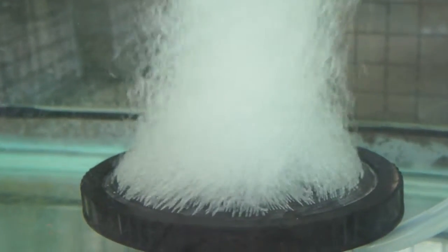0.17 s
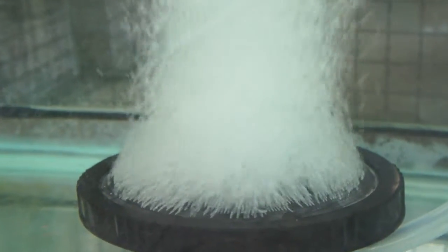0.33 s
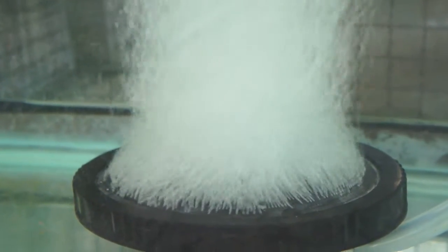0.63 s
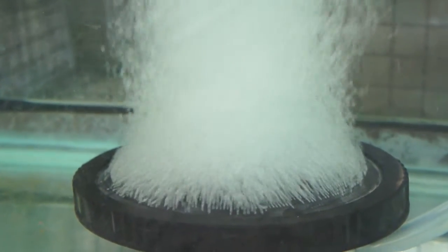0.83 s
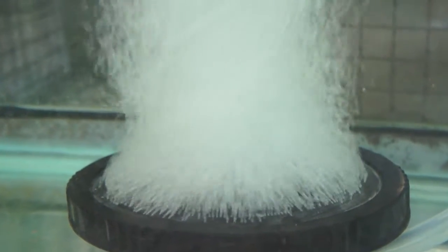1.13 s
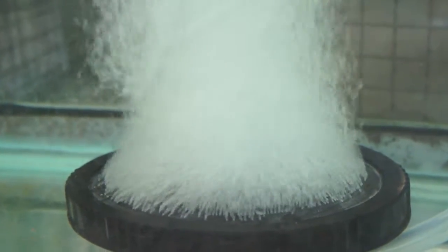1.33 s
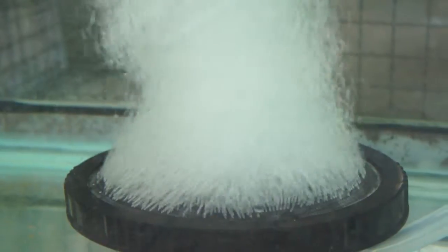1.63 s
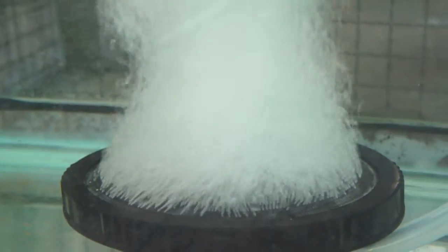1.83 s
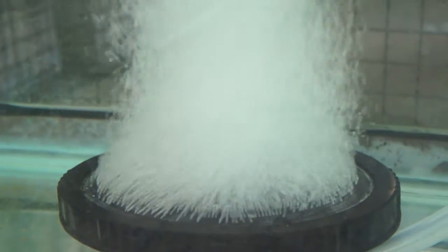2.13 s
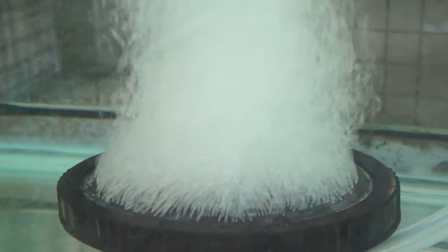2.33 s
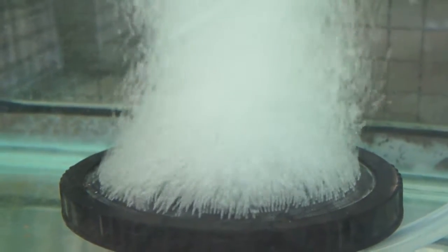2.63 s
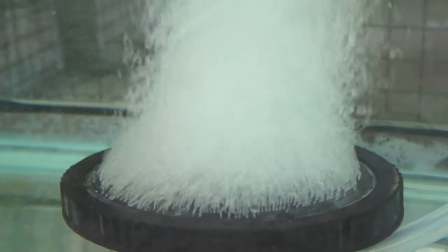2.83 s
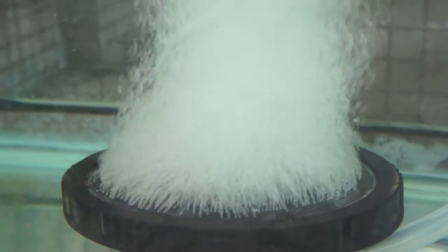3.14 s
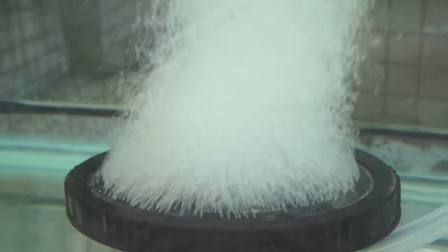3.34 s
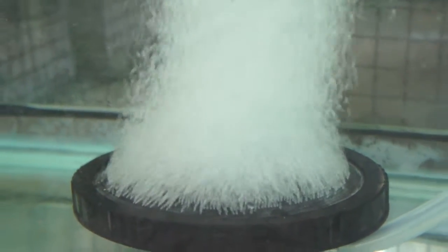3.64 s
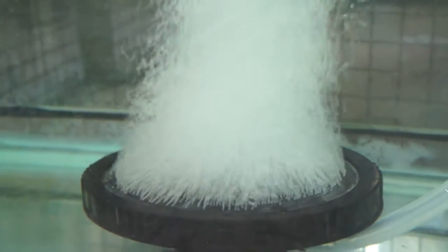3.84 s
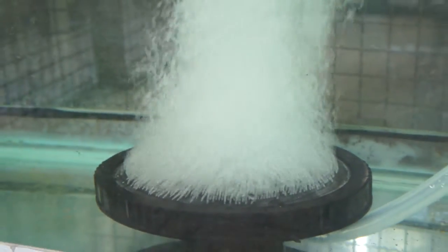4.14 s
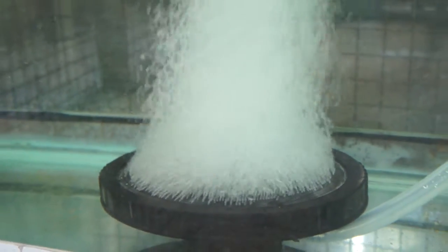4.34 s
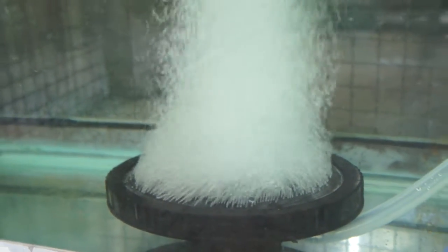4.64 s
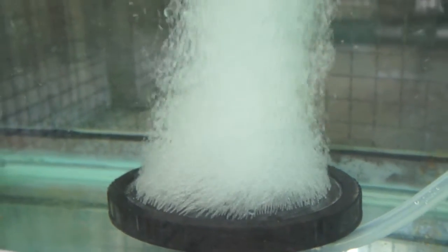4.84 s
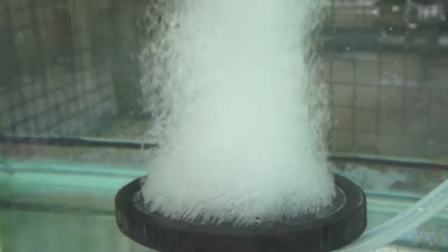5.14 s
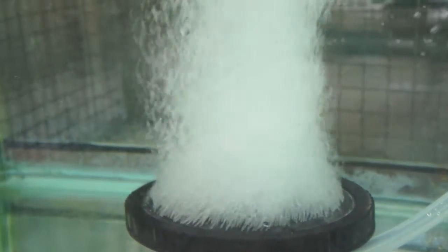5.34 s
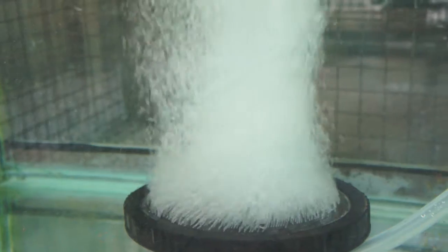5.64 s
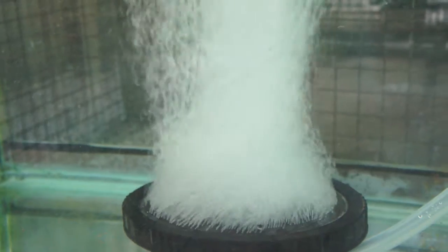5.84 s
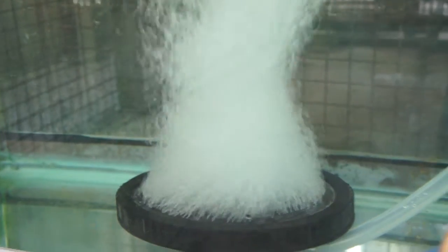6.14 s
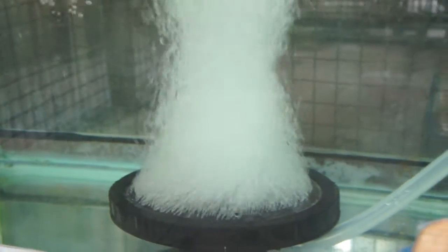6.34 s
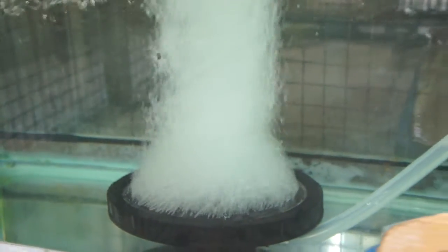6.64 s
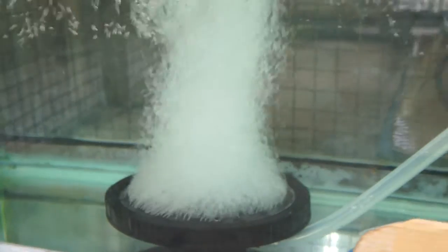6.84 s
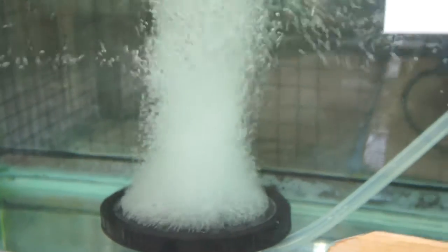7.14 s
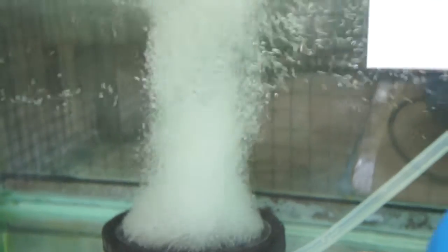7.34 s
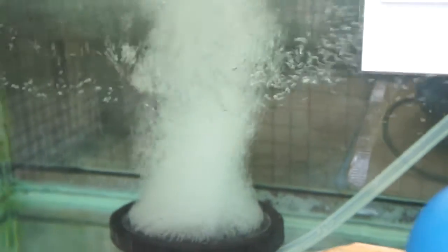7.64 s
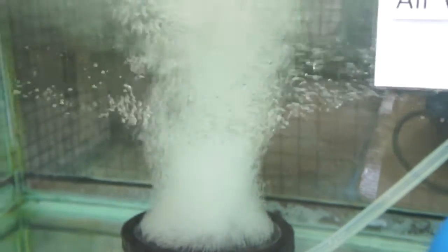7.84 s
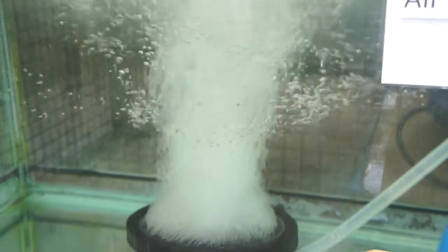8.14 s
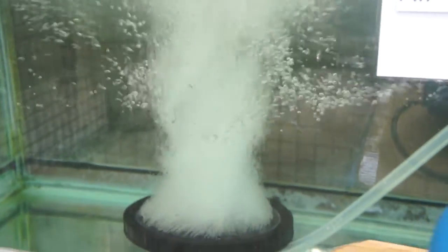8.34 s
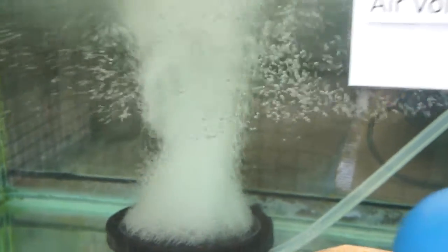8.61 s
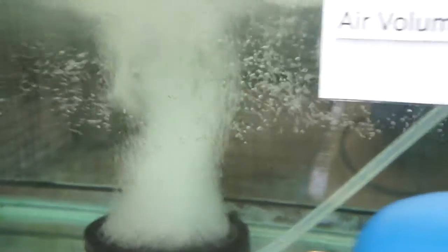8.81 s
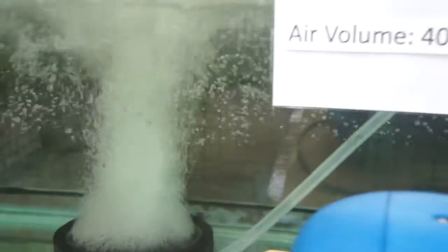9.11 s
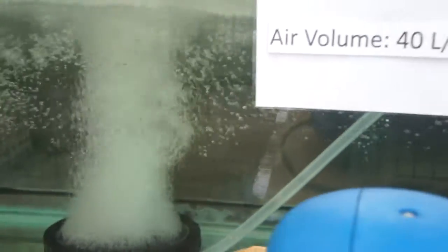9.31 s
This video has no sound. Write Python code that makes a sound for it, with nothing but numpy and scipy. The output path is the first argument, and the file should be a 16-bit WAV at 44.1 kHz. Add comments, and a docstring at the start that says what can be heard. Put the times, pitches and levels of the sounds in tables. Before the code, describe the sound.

An air blower drones with a throbbing hum over steadily bubbling, fizzing water and occasional small splashes.

```python
"""A steady drone and a throbbing hum over bubbling water, with a small splash now and then.
A mains-driven diaphragm air blower makes the hum; its flap valves rasp on every stroke.
It feeds a disc diffuser in a glass tank, where a column of bubbles churns, surges and fizzes.
The listener moves through the room's standing waves, so the drone fades out and returns."""
import sys
import numpy as np
from scipy import signal
from scipy.fft import rfft, irfft, next_fast_len
from scipy.io import wavfile
from scipy.ndimage import map_coordinates

SR = 44100
rng = np.random.default_rng(int(sys.argv[2]) if len(sys.argv) > 2 else 0)


def unload_audio(sound):
    """Save the sound as a 16-bit wav file, at the path given as the first command line argument."""
    columns = np.transpose(np.atleast_2d(sound))
    # keep every value between -1 and 1, then stretch to whole-number steps
    steps = np.round(np.clip(columns, -1, 1) * 32767)
    wavfile.write(sys.argv[1], SR, steps.astype(np.int16))


N = 417627
TIME = np.arange(N) / SR
STROKE_HZ, DRONE_ORDER = 60.011, 11
SOUND_M_PER_S = 343
EARS = np.array([[.5], [-.5]])  # splits a left-minus-right value

# Listener's path. Each row: time in seconds, left and right ear's offset from the drone's node in m.
WALK = [(0, 0.11, 0.11), (4.7, 0.11, 0.093), (5.5, 0.089, 0.067), (6.5, 0.065, 0.03), (7, .033, 0.031),
        (7.5, 0.0026, 0.025), (8.3, -0.029, 0), (9.47, -0.048, -0.033)]
# The tank lies to the left. Each row: frequency in Hz, left minus right in dB.
PAN = [(45, 3), (130, 3), (380, 4), (650, 5.5), (1200, 4.5), (2000, 1.1), (11000, 1)]
# Stereo field. Each row: frequency in Hz, left-right correlation.
CORRELATION = [(60, 0.69), (300, 0.89), (550, 0.68), (700, 1), (1000, 0.064), (2000, 0.12), (3000, -0.19),
               (5000, -0.46), (6300, -0.4), (8000, -0.03), (11000, 0.098)]
# How hard the water churns. Each row: time in seconds, level in dB.
CHURN = [(0, -0.5), (2.8, 1.4), (4.2, 3), (5.7, 3.5), (6.4, 0.7), (8.2, -1.25), (9.47, -1.5)]
# Water and valve spectra. Each row: frequency in Hz, relative density in dB.
GURGLE_SPECTRUM = [(20, -33), (45, -16), (85, -5.5), (170, -3), (300, -1), (550, -3.5), (850, -7.5),
                   (1300, -23), (3000, -63.5)]
BUBBLING_SPECTRUM = [(300, -44), (700, -12), (1000, 2.5), (1600, 0.5), (2400, -2), (3300, -8),
                     (4500, -16.5), (9000, -73)]
FIZZ_SPECTRUM = [(1500, -49), (2800, -3), (3800, 1.5), (5000, 0.5), (6700, -2.5), (7600, -8), (9000, -8.5),
                 (11000, -11.5)]
VALVE_SPECTRUM = [(1500, -39), (2000, 7.5), (3400, 2), (4200, -7), (5800, -4), (6700, -2), (7500, -6),
                  (11000, -20)]
# Surface surges. Each row: peak time and half length in seconds, level in dB, centre in Hz,
# spray relative to the surge in dB.
SURGES = [(4.12, 0.81, -42.5, 2700, -8.5), (5.4, .5, -44, 1370, -31), (5.3, .25, -45, 2600, -24),
          (5.83, .17, -45, 3200, -25)]
# Splashes. Each row: start in seconds, level in dB, centre in Hz, width in octaves, decay in seconds.
SPLASHES = [(0.516, -37.5, 3170, 0.22, 0.044), (0.904, -40, 3200, 0.65, .06), (0.986, -47, 8050, 0.57, .04),
            (1.962, -42, 4820, 0.35, 0.061), (2.182, -48, 8600, 0.24, 0.049), (2.267, -45, 6460, .8, .05),
            (3.763, -46.5, 8500, .4, .045), (3.979, -34.5, 3900, 0.41, 0.026),
            (4.601, -40.5, 4000, 0.55, 0.06), (7.039, -43, 1690, 1.3, .06), (7.344, -38, 2380, 1.1, .045),
            (7.649, -45.5, 4500, 1.1, .07), (7.949, -45, 4500, 0.58, .043), (8.54, -44.5, 5450, .08, .02),
            (8.747, -36, 2400, 0.71, .035), (8.87, -43.5, 3600, .8, .04)]
# Strong hum partials. Each row: multiple of the stroke rate, level at the first spot in dB,
# change at the second spot in dB, left minus right in dB.
STRONG_PARTIALS = [(1, -50.7, -15, -2), (2, -38.7, -2.5, 1), (3, -35.7, -2.5, 3), (4, -43.2, 0, 1.5),
                   (5, -37.5, .5, 5), (7, -43, -7.5, 4), (9, -45.2, -11, 6), (10, -39.2, -9, 3.5),
                   (12, -45, -8, 6), (14, -35.8, -2.3, 6.5), (18, -38, -6.2, -2.5), (21, -48.7, -6, 9),
                   (24, -47.5, -7, 6), (26, -44, -6, 0), (27, -47.5, -4, -3), (28, -42.3, -9.5, 0)]
# Envelope of the weak partials. Each row: frequency in Hz, level in dB.
WEAK_SPECTRUM = [(360, -49.5), (480, -59), (780, -54.5), (900, -63.5), (1300, -56.5), (1740, -53),
                 (1850, -58)]
# Blower phase. Each row: frequency in Hz, left ear's lag behind the right in radians.
EAR_LAG = [(120, .03), (400, 0.24), (660, 0.89), (1260, 1.34), (1700, 1.22)]


def amp(db):
    """Decibels to gain."""
    return 10 ** (np.asarray(db) / 20)


def unit(x):
    """x at rms 1."""
    return x / np.sqrt(np.mean(x ** 2) + 1e-20)


def along(points, hz):
    """(Hz, value) points read on a log axis."""
    knots_hz, values = np.transpose(points)
    return np.interp(np.log(hz + 1), np.log(knots_hz + 1), values)


def curves(rows):
    """One value per sample for each column after the time."""
    times_s, *columns = np.transpose(rows)
    return np.array([np.interp(TIME, times_s, column) for column in columns])


def wobble(knots_per_s):
    """Smooth random curve."""
    coarse_s = TIME[::64]
    knots = rng.standard_normal(int(TIME[-1] * knots_per_s) + 4)
    return np.interp(TIME, coarse_s, map_coordinates(knots, [coarse_s * knots_per_s]))


def filtered(x, response):
    """x through a frequency response."""
    size = x.shape[-1]
    padded = next_fast_len(size + SR // 8)
    return irfft(rfft(x, padded) * response(np.fft.rfftfreq(padded, 1 / SR)), padded)[..., :size]


def bell(centre_hz, octaves):
    """Bell-shaped response on a log axis."""
    return lambda hz: np.exp(-.5 * (np.log2((hz + 1) / centre_hz) / octaves) ** 2)


def spread(pair, spectrum):
    """Two unrelated signals to a coloured stereo field, rms 1."""
    def field(hz):
        turn_rad = np.arccos(np.clip(along(CORRELATION, hz), -1, 1)) / 2
        left = amp(along(PAN, hz) / 2)
        mid, side = np.cos(turn_rad), np.sin(turn_rad)
        mix = np.array([[mid * left, side * left], [mid / left, -side / left]])
        return amp(along(spectrum, hz)) * mix
    return unit(filtered(pair, field).sum(axis=1))


def arrival(midway_m=0.025, blend_m=0.037):
    """Listener's progress from the first spot (0) to the second (1)."""
    return .5 + .5 * np.tanh((midway_m - curves(WALK)[0]) / blend_m)


def wash(centre_hz, octaves):
    """One band of the water's rush, stereo, rms 1."""
    return spread(filtered(rng.standard_normal((2, N)), bell(centre_hz, octaves)), [(centre_hz, 0)])


def rumble(start_s=2.8, end_s=7.5, fade_s=.9, level_db=-54):
    """Uneven low rumble under the hardest churn."""
    held = np.clip(np.minimum(TIME - start_s, end_s - TIME) / fade_s, 0, 1)
    return held * amp(level_db - wobble(3)) * wash(centre_hz=85, octaves=0.13)


def surges():
    """The column breaks the surface harder: a swell in the band of its bubble size, plus spray."""
    out = np.zeros((2, N))
    spray = wash(centre_hz=6940, octaves=0.097)
    for peak_s, half_s, db, centre_hz, spray_db in SURGES:
        swell = amp(db) * np.exp(-((TIME - peak_s) / half_s) ** 2)
        out += swell * (wash(centre_hz, octaves=0.21) + amp(spray_db) * spray)
    return out


def splashes(rise_s=0.0026, spikiness=.4, clumps_per_s=250, spray_db=-16):
    """Short showers of droplets landing in clumps, with fine spray; different at each ear."""
    out = np.zeros((2, N + SR))
    t = np.arange(SR // 4) / SR
    for start_s, db, centre_hz, octaves, decay_s in SPLASHES:
        drops = rng.standard_normal((2, len(t))) * np.exp(spikiness * rng.standard_normal(len(t)))
        drops *= amp(map_coordinates(rng.standard_normal(80), [t * clumps_per_s], mode="nearest"))
        shower = unit(filtered(drops, bell(centre_hz, octaves)))
        spray = amp(spray_db) * unit(filtered(drops, bell(centre_hz=8500, octaves=0.27)))
        envelope = (1 - np.exp(-t / rise_s)) * np.exp(-(t / decay_s) ** 2)
        at = round(start_s * SR)
        out[:, at:at + len(t)] += amp(db) * envelope * (shower + spray)
    return out[:, :N]


def bubbles(low_hz, high_hz, decay_cycles, scatter_db, count, samples):
    """Bubble swarm: damped sines, each rising slightly in pitch as it nears the surface."""
    when, pitch, strength = rng.random((count, 3)).T[:, :, None]
    hz = low_hz + (high_hz - low_hz) * pitch
    cycles = hz * np.arange(samples) / SR
    age = cycles / decay_cycles
    gain = np.sqrt(hz) * amp(-scatter_db * np.log(np.maximum(1 - strength, 1 / count)))
    envelope = np.exp(-age) * (1 - np.exp(-2 * cycles))
    rings = gain * envelope * np.sin(2 * np.pi * cycles * (1 + 0.021 * age))
    at = (when * N).astype(int) + np.arange(samples)
    return unit(np.bincount(at.ravel(), rings.ravel(), N)[:N])


def froth(spectrum, swarms, swarm_db):
    """Near bubbles over the noise of countless others."""
    return spread(rng.standard_normal((2, N)) + amp(swarm_db) * np.array(swarms), spectrum)


def water(gurgle_db=-36, bubbling_db=-38, fizz_db=-44.5):
    """Big bubbles gurgle, medium ones burst at the surface, the finest fizz; all grow with the churn."""
    churn_db, = curves(CHURN)
    heave = wobble(4.4)
    medium = [bubbles(774, 3880, decay_cycles=4.6, scatter_db=1.0, count=8000, samples=300)
              for _ in range(2)]
    fine = [bubbles(3070, 10860, decay_cycles=4, scatter_db=1.5, count=14000, samples=100)
            for _ in range(2)]
    gurgle_gain = amp(gurgle_db + 0.61 * churn_db + 0.47 * wobble(5.9))
    gurgle = gurgle_gain * spread(rng.standard_normal((2, N)), GURGLE_SPECTRUM)  # too dense to resolve
    bubbling_gain = amp(bubbling_db + 0.98 * churn_db + 0.3 * heave + 0.89 * wobble(12))
    bubbling = bubbling_gain * froth(BUBBLING_SPECTRUM, medium, swarm_db=-14)
    fizz_gain = amp(fizz_db + 0.42 * churn_db - 0.4 * arrival() + 0.42 * heave + 0.36 * wobble(22))
    fizz = fizz_gain * froth(FIZZ_SPECTRUM, fine, swarm_db=-10.5)
    return gurgle + bubbling + fizz


def reflections(x, depth_db=1.67, spacing_hz=90, drift_per_s=0.77):
    """Echoes off glass and walls ripple the spectrum; the ripple drifts as the listener moves."""
    hz, times_s, frames = signal.stft(x, SR, nperseg=2048)
    grid = np.meshgrid(hz / spacing_hz, times_s * drift_per_s, indexing="ij")
    knots = rng.standard_normal((2, 400, 16))
    ripple = np.array([map_coordinates(ear, grid, mode="mirror") for ear in knots])
    taper = np.clip(hz / 2000, 0, 1)[:, None]  # long waves stay smooth
    return signal.istft(frames * amp(depth_db * ripple * taper), SR, nperseg=2048)[1][:, :N]


def valves(first_spot_db=-50.5, second_spot_db=-55):
    """Flap valves rasp alike on every stroke: a comb of faint high partials, different at each spot."""
    samples = round(SR / STROKE_HZ)
    position = TIME * STROKE_HZ * samples % samples

    def rasp():
        stroke = rng.standard_normal((2, samples))
        looped = np.array([map_coordinates(noise, [position], mode="grid-wrap") for noise in stroke])
        return spread(looped, VALVE_SPECTRUM)

    walked = arrival()
    return amp(first_spot_db) * (1 - walked) * rasp() + amp(second_spot_db) * walked * rasp()


def partial(order, phase_rad=0, dispersion_rad=1.3, smear_rad=0.56):
    """One stroke harmonic, rms 1. The room delays each differently, blurring strokes into a throb."""
    hz = order * STROKE_HZ
    room_lag_rad = dispersion_rad * order ** 2 + smear_rad * rng.standard_normal()
    ear_lag_rad = along(EAR_LAG, hz) * EARS
    return np.sqrt(2) * np.cos(2 * np.pi * hz * TIME + phase_rad - room_lag_rad - ear_lag_rad)


def hum(top_order=32, sway_db=1.05, scatter_db=0.95, weak_change_db=-2, weak_pan_db=4.5):
    """The diaphragm strokes in step with the mains: exact harmonics of one rate."""
    taken = [DRONE_ORDER] + [row[0] for row in STRONG_PARTIALS]
    weak = []
    for order in range(1, top_order + 1):
        if order not in taken:
            db = along(WEAK_SPECTRUM, order * STROKE_HZ) + scatter_db * rng.standard_normal()
            weak.append((order, db, weak_change_db, weak_pan_db))
    out = np.zeros((2, N))
    walked = arrival()
    for order, db, change_db, pan_db in STRONG_PARTIALS + weak:
        spot_gain = 1 - walked + amp(change_db) * walked
        level_db = db + sway_db * wobble(3.024)  # listener sways through this partial's standing waves
        out += spot_gain * amp(level_db + pan_db * EARS) * partial(order)
    return out


def drone(crest_db=-21.5, pan_db=1.9, node_depth_db=-25, waver_db=0.16):
    """The blower's strongest partial stands in the room; it fades and flips as an ear crosses the node."""
    wavelength_m = SOUND_M_PER_S / (DRONE_ORDER * STROKE_HZ)
    node_floor = 1j * np.sign(EARS) * amp(node_depth_db)
    standing = np.sin(2 * np.pi * curves(WALK) / wavelength_m) + node_floor
    gain = amp(crest_db + pan_db * EARS + waver_db * wobble(6.9))
    return gain * abs(standing) * partial(DRONE_ORDER, np.angle(standing))


def scene():
    """Blower and tank together."""
    blower = drone() + hum() + valves()
    tank = reflections(water() + surges() + rumble()) + splashes()
    return blower + tank


def record(dry, lead_hz=105, top_hz=11050):
    """The left channel leads in the bass; nothing passes above top_hz."""
    return filtered(dry, lambda hz: (hz < top_hz) * np.exp(1j * np.arctan2(lead_hz, hz) * EARS))


dry = scene()
out = record(dry)
unload_audio(out)
```